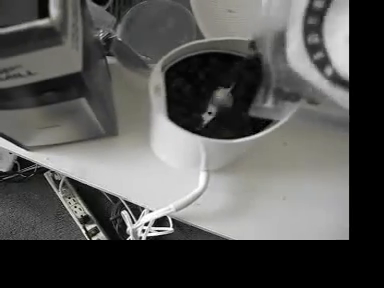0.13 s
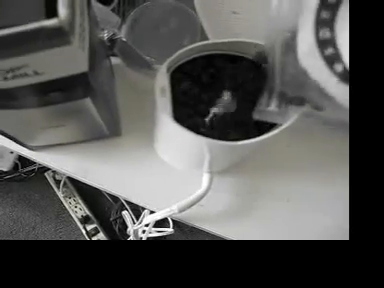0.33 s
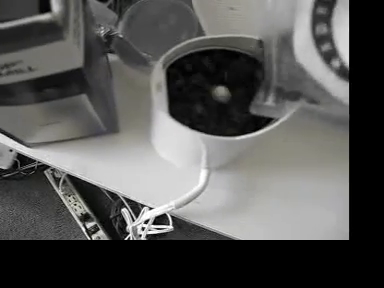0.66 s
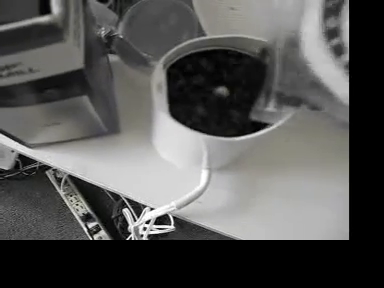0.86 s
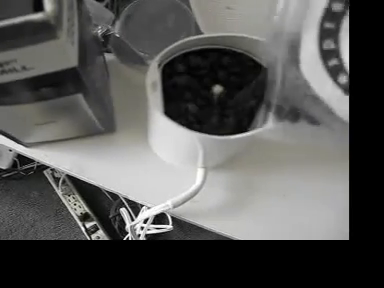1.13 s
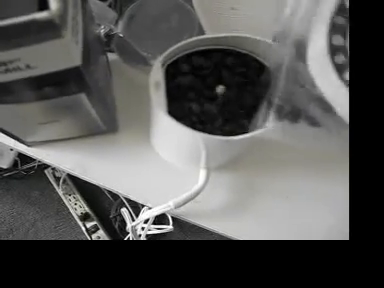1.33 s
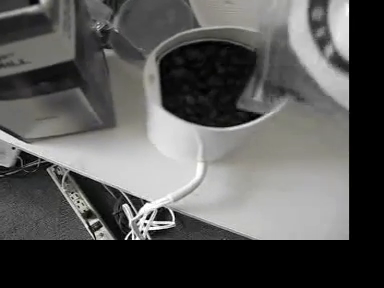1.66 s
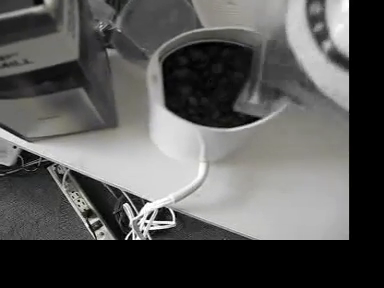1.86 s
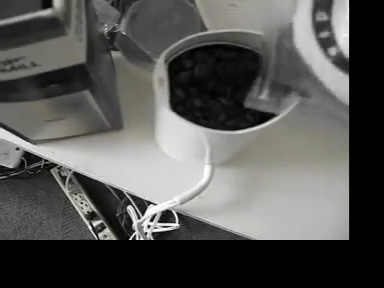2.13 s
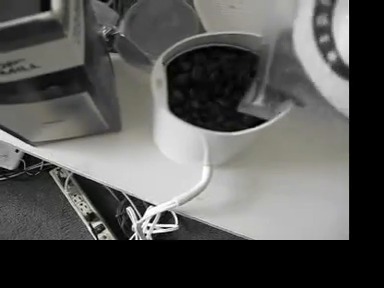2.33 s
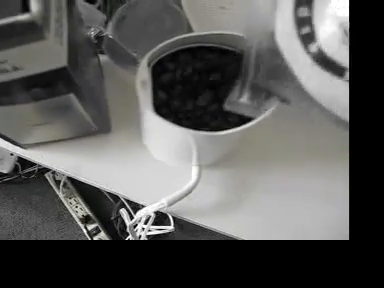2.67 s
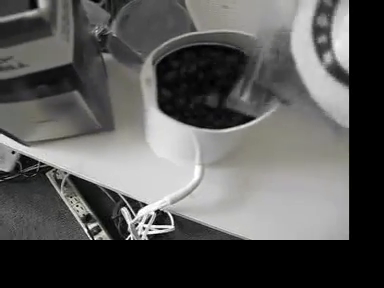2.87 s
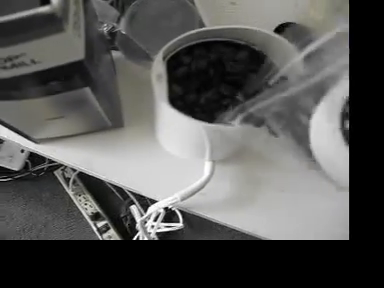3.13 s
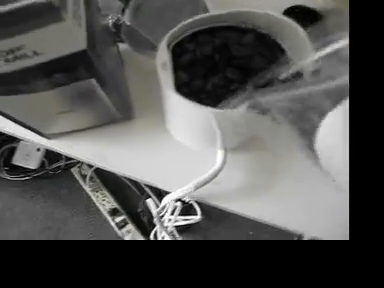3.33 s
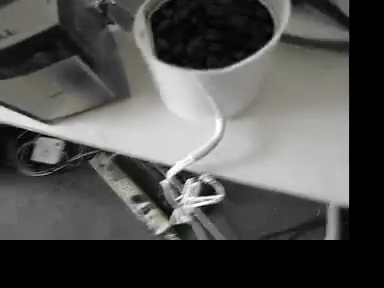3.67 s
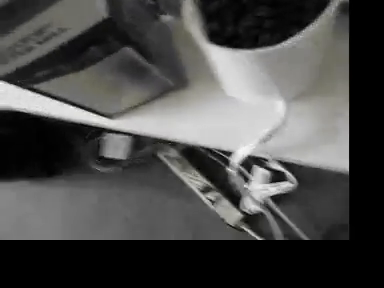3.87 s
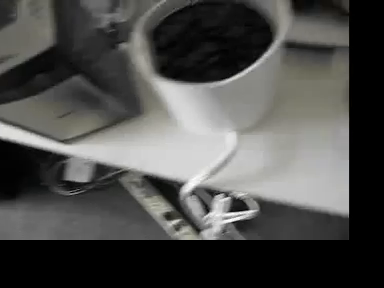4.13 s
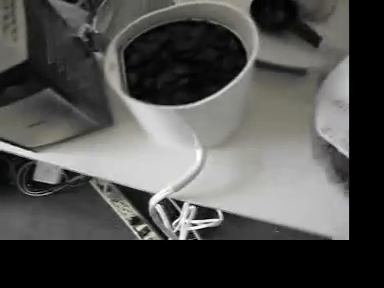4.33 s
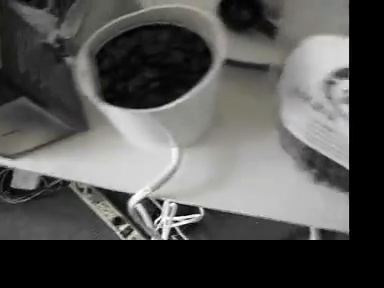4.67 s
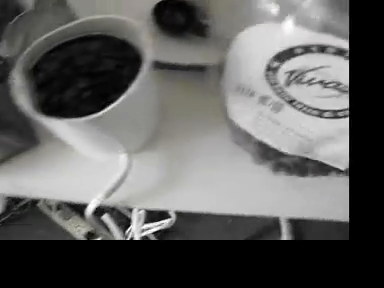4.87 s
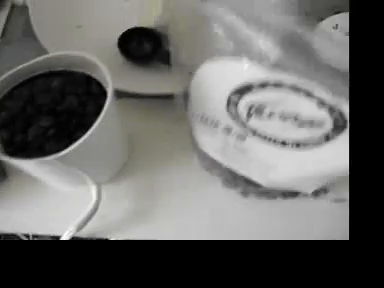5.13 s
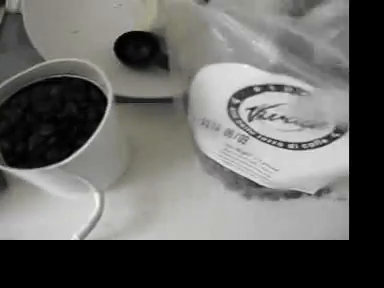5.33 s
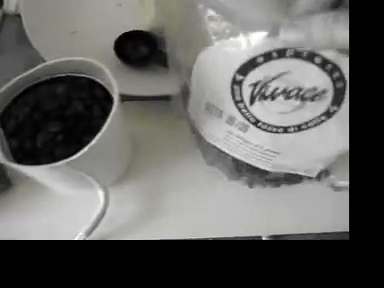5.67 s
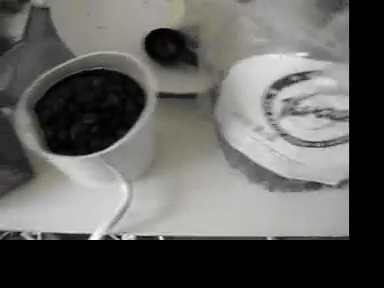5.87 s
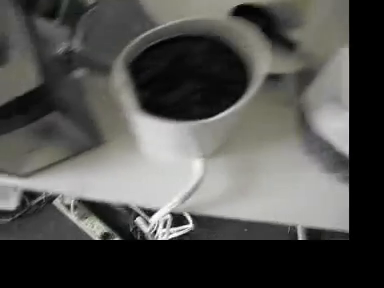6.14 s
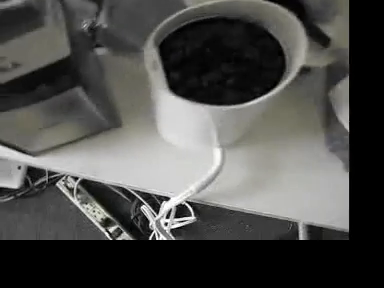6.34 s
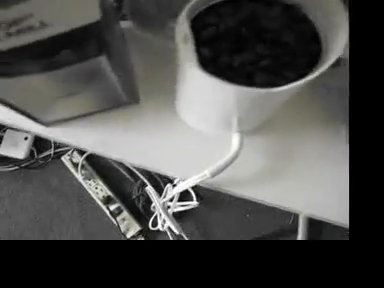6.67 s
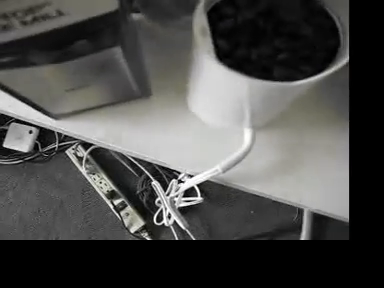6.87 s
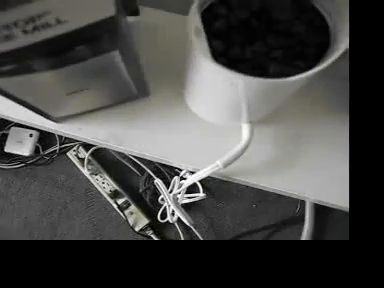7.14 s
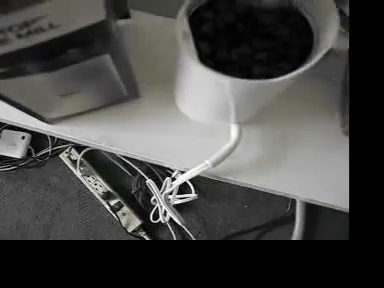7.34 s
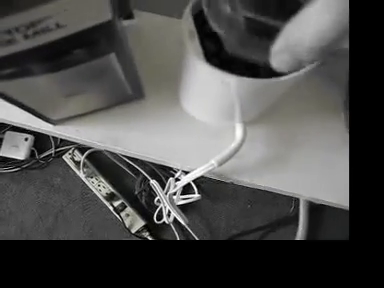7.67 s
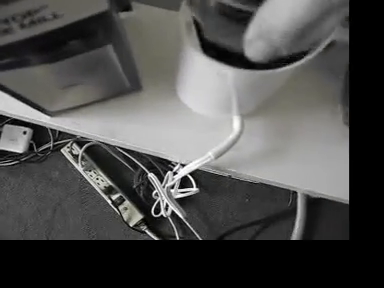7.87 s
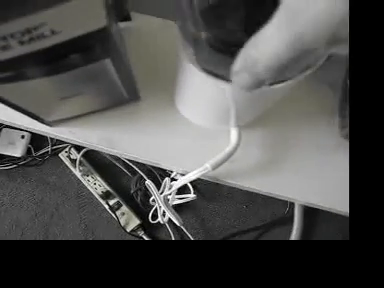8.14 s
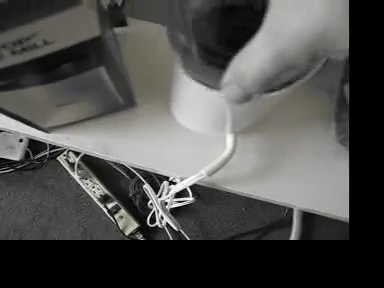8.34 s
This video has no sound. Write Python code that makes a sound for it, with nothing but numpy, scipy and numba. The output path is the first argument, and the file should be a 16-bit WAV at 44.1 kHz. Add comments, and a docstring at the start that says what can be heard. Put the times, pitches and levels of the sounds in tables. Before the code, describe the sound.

Crisp plastic film snaps and rattling beans fill the first three seconds, followed by broader crumples, bumps and slides of the bag across a table, with faint tiny squeaks. A quieter pause of steady hiss follows, broken by small crackles. Then a hard plastic lid taps and scrapes onto a hollow cup, its note sinking as it closes. Dry small room, close and slightly saturated microphone.

```python
"""Coffee beans are shaken out of a stiff plastic bag into the cup of a small blade grinder, close to a small
microphone in a quiet room. The bag crackles, slides over the table and is put down: noise bursts coloured by
its air, sheet and beans, with short damped sines for pops and pings. A few squeaks are gliding tones. Then a
plastic lid is knocked onto the cup, whose air note, a damped sine, falls as the lid closes. The motor stays off."""
import sys
import numpy as np
from scipy import signal
from scipy.fft import rfft, irfft
from scipy.io import wavfile
from scipy.ndimage import uniform_filter1d
from numba import njit

SR = 44100
rng = np.random.default_rng(int(sys.argv[2]) if len(sys.argv) > 2 else 0)


def gain_from_db(level_db):
    """Convert decibel levels to linear amplitude factors (20 dB per decade)."""
    decades = np.asarray(level_db, float) / 20
    return 10 ** decades


def unload_wav(signal):
    """Save mono or channel-first audio to the path in sys.argv[1] as 16-bit WAV at rate SR, clipped to [-1, 1]."""
    wavfile.write(
        sys.argv[1],
        SR,
        np.round(np.clip(np.atleast_2d(signal).T, -1, 1) * 32767).astype(np.int16),
    )


N = 374409  # length [samples]


def curves(table):
    """Linear interpolation: turns the columns of a table into signals over its first column, time."""
    s, *columns = np.transpose(table)
    return [np.interp(np.arange(N) / SR, s, c) for c in columns]


def gestures(table, swell, fade):
    """Power summation: rows of (start, hold, levels) swell and fade at rates in dB/s; gives levels in dB."""
    t, power = np.arange(N) / SR, 1e-12
    for start, hold, *db in table:
        before_db = np.outer(swell, np.maximum(start - t, 0))
        after_db = np.outer(fade, np.maximum(t - start - hold, 0))
        away_db = np.minimum(before_db + after_db, 200)
        power = power + gain_from_db(2 * (np.array(db)[:, None] - away_db))
    return 10 * np.log10(power)


def bursts(power, t60, rise_ms):
    """Exponential decay of energy: each power spike starts a noise puff; also gives the area of the decay."""
    pole = np.exp(-2 * np.log(1000) / (t60 * SR))
    lag = np.exp(-1000 / (rise_ms * SR))
    swell = signal.lfilter([1 - lag], np.convolve([1, -pole], [1, -lag]), power)
    return np.sqrt(np.abs(swell)) * rng.standard_normal(N), 1 / (1 - pole)


def ringing(x, colour):
    """Minimum-phase filtering: a spectrum (Hz, dB) becomes a causal response of unit energy."""
    hz, db = np.transpose(colour)
    log_gain = np.interp(np.log(np.arange(513) * SR / 1024 + 1), np.log(hz), db) * np.log(10) / 20
    # folding the cepstrum onto positive times makes the response causal
    fold = irfft(log_gain) * np.r_[1, 2 * np.ones(511), 1, np.zeros(511)]
    h = irfft(np.exp(rfft(fold)))
    return signal.oaconvolve(x, h / np.linalg.norm(h))[:N]


@njit
def ring(start, hz, t60, size, rise):
    """Damped free vibration: decaying sines, less a faster decay that softens the attack."""
    out = np.zeros(N)
    for g in range(len(start)):
        turn = np.exp(2j * np.pi * hz[g] / SR - np.log(1000.) / (t60[g] * SR))
        z, lag = size[g] + 0j, 1.
        for i in range(start[g], min(N, start[g] + int(t60[g] * SR))):
            z, lag = z * turn, lag * rise
            out[i] += z.imag * (1 - lag)
    return out


def strike(s, hz, t60, db, rise_ms):
    """Impulse excitation: rings a mode for every (time, pitch, decay, level), broadcast together."""
    s, hz, t60, db = (np.ravel(a) * 1. for a in np.broadcast_arrays(s, hz, t60, db))
    rise = np.exp(-1000 / (rise_ms * SR))
    return ring((s * SR).astype(np.int64), np.clip(hz, 50, .45 * SR), t60, gain_from_db(db), rise)


def air():
    """Stationary random noise: steady hiss and room rumble, shaped in the frequency domain."""
    # room and microphone noise: (frequency [Hz], relative spectral density [dB])
    density = [(24, -13), (40, -9.5), (176, -7), (249, -7), (363, -7), (751, -7.5), (1440, -10.5),
               (1850, -12), (10700, -22.5), (16000, -36)]
    rms_db = -46.5
    hz, db = np.transpose(density)
    f = np.arange(N // 2 + 1) * SR / N + 1
    gain = gain_from_db(np.interp(np.log(f), np.log(hz), db))
    hiss = irfft(rfft(rng.standard_normal(N)) * gain, N)
    return gain_from_db(rms_db) * hiss / np.std(hiss)


def bag():
    """Impulsive excitation: loud cracks, chance small cracks and grains shake three parts of the bag."""
    # loud cracks of film and beans: (time [s], thud [dB], body [dB], snap [dB]), relative levels
    cracks = [(0.0516, -36, -15, -13), (.072, -39, -29, -3), (0.0983, -46, -17, -12),
              (0.1676, -45, -35, -13), (0.18, -30, -23, -4), (0.2258, -39, -46, -10), (.2586, -43, -19, -8),
              (.317, -48, -28, -10), (.3423, -26, -22, -9), (.4265, -16, -24, -16), (0.4454, -23, -10, -21),
              (0.4564, -39, -18, -2), (0.4819, -40, -16.5, -4), (0.509, -35, -22, -19),
              (.5864, -26, -18, -6), (0.6308, -20.5, -16, -14), (0.6552, -38, -23, -7),
              (0.7045, -30, -17.5, -8), (0.7619, -28, -20, -8), (0.7912, -35, -17, -4),
              (.8024, -51.5, -27, -10), (0.8474, -28, -16, -4), (0.8552, -25, -19, -5),
              (0.8998, -47, -24, -3), (.9081, -45, -34, -5), (0.928, -44, -28.5, -7),
              (0.956, -47, -19, 0.5), (1.0115, -36, -20, -28), (1.0876, -33, -36, -18),
              (1.116, -26, -18.5, -5.5), (1.1345, -52, -23, -7), (1.161, -41, -20, -5),
              (1.2329, -44, -42, -6), (1.2381, -32, -37, -7.5), (1.2685, -52, -44, -10.5),
              (1.2919, -42, -13.5, -8), (1.299, -39, -41, -6), (1.3272, -34, -15, -25),
              (1.4495, -11, -14.5, -9), (1.462, -38, -34, -8.5), (1.515, -18, -14, -29),
              (1.5549, -45, -18.5, -9.5), (1.6003, -16, -20, -15), (1.682, -43, -20, -8),
              (1.697, -30, -31, -7), (1.7087, -38, -21, -7), (1.76, -11, -14.5, -3), (1.7955, -41, -29, -7),
              (1.8794, -41, -25, -9.5), (1.9335, -13, -16, -12), (1.9403, -51, -30, -4),
              (1.9733, -36, -33, -11), (2.001, -27, -17, -0.5), (2.025, -24, -21, -3),
              (2.0471, -32, -36, -9), (2.0783, -15.5, -37, -28), (2.1168, -45, -26, -5),
              (2.1767, -38, -21, -30), (2.1883, -21, -25, -33), (2.219, -40, -57, -17.5),
              (2.2548, -14.5, -14.5, -19), (2.338, -22, -17, -31), (2.3897, -47, -45, -7),
              (2.4273, -38, -30, -7), (2.4543, -43, -31, -11), (2.4748, -31, -35, -10),
              (2.524, -43, -23, -13), (2.5615, -16, -40, -6.5), (2.7128, -39, -23, -14),
              (2.7759, -49, -49, -12), (2.8401, -12.5, -11.5, -30), (2.877, -54, -28, -12.5),
              (2.9125, -23.5, -23, -45), (3.0035, -40, -23, -6.5), (3.0404, -12, -12, -24),
              (3.0779, -28, -5, -33), (3.2436, -21, -9, -17), (3.288, -17, -9, -40),
              (3.2974, -18, -3.5, -37), (3.373, -28, -27, -44), (3.403, -10, -10, -34),
              (3.5162, -28, -24, -15.5), (3.58, -31, -14.5, -36), (3.6368, -15, -6.5, -26),
              (3.656, -28, -8, -27), (3.695, -29, -12, -16), (3.7706, -12, -9.5, -11),
              (3.806, -41, -40, -16), (3.839, -41, -52, -17), (3.86, -39, -50, -28),
              (3.8936, -22, -19.5, -42), (3.911, -16, -11, -23), (3.9362, -18, -3, -29),
              (3.959, -23, -3.5, -20), (3.9822, -36, -3, -27), (4.105, -39, 2, -4.5),
              (4.1821, -16, -1, -16), (4.187, -17, -5.5, -23), (4.327, -30, -17, -27),
              (4.379, -40, -25, -18), (4.405, -45, -35, -21), (4.4825, -8, -0.5, -1),
              (4.7485, -25, -9, -24), (4.7868, -18, -10.5, -35), (4.8823, -21, -5.5, -39),
              (4.9876, -25.5, -23.5, -48), (5.1295, -28, -27, -41), (5.326, -45, -40, -38),
              (5.3425, -19, -11.5, -27), (5.354, -19, -4.5, -16), (5.37, -27, -1.5, -14),
              (5.3876, -31, -8, -7), (5.4446, -24, -15, -33), (5.5097, -25, -16.5, -49),
              (5.6609, -51, -26.5, -24.5), (6.719, -31, -44, -45), (6.902, -48, -28.5, -21),
              (6.9816, -47, -29, -17), (7.0174, -23, -14, -9.5), (7.057, -30.5, -21, -12)]
    # shakes, slides and folds: (start [s], hold [s], thud [dB], body [dB], snap [dB]), relative levels
    moves = [(.03, 0.13, -45, -32.5, -30.5), (.23, 0.22, -47, -34, -33), (.43, 0.13, -47, -38, -33),
             (.59, 0.11, -43.5, -34.5, -33.5), (.79, 0.27, -44, -36, -37), (1.09, 0.14, -46.5, -36, -35),
             (1.29, 0.13, -41.5, -38, -45.5), (1.46, 0.046, -42.5, -38.5, -49),
             (1.6, 0.084, -40, -33, -39.5), (1.75, 0.1, -39.5, -33, -37), (1.94, 0.25, -49, -39, -39.5),
             (2.33, 0.19, -46, -37.5, -39), (2.55, .12, -42, -37.5, -36.5), (2.77, 0.16, -52, -46, -46),
             (2.96, 0.05, -36.5, -35, -44), (3.08, 0.058, -37, -36.5, -51), (3.29, 0.042, -36, -36.5, -49),
             (3.53, 0.095, -43, -36.5, -42), (3.63, 0.099, -28.5, -22.5, -24.5),
             (3.92, 0.037, -39, -33.5, -36), (3.97, 0.11, -30, -24, -27), (4.17, 0.21, -36, -28, -27),
             (4.49, 0.017, -35, -30.5, -31.5), (4.77, 0.11, -36.5, -34, -47),
             (5.03, 0.01, -46, -35.5, -42.5), (5.37, 0.043, -36.5, -29, -34), (5.65, 0.014, -52, -39, -47),
             (5.77, 0.0075, -49.5, -47, -54), (6.49, .02, -66, -52, -59), (6.71, 0.01, -49, -54, -56),
             (6.79, 0.029, -52, -54, -47), (6.9, 0.025, -50, -48, -45), (7.005, 0.01, -38.5, -33, -29.5)]
    # handling of the bag: (time [s], spread of grain sizes [dB], share of bright snaps [0-1],
    # share of rattling beans [0-1], level of small cracks [dB])
    touch = [(0, 5, 1, 0.99, 0.5), (1.3, 5, 0.86, 0.75, 4), (1.5, 5, 0.97, 0.22, -1),
             (2.1, 3, 0.92, 0.07, 4.5), (2.7, 5, 1, 0.07, 3), (3, 6.5, 0.5, 0.06, -0.5),
             (3.3, 11, 0.4, 0, -9), (3.6, 2.5, 0.12, 0.05, -16), (3.85, -2, 1, 0, -7),
             (3.96, 2, 0.37, 0, -7), (4.3, -1, 0.96, 0.7, -10), (4.5, 3.5, .4, 0.23, -10.5),
             (4.8, 4.5, 0, .23, -1), (5.4, 2.5, .05, 0.1, -14), (5.8, 4, 0.3, 0.05, -26),
             (7, 4, 0.32, 0.16, -2)]
    # rows thud, body, snap: (t60 [s], rise [ms], attack [dB], grain rate [1/s])
    parts = [(0.0048, 1.5, -3.5, 2500), (0.0062, 1.2, 0.5, 2000), (0.0018, 0.27, 1.5, 1100)]
    # sharp first step of the film in a crack: level [dB] for thud, body, snap
    click_db = [1, -0.5, -1]
    # colour of the air in the bag: (frequency [Hz], level [dB])
    thud_colour = [(60, -49), (130, -22.5), (250, -20.5), (450, -11), (650, -5.5), (950, -8.5),
                   (1300, -14.5), (3000, -50.5)]
    # colour of the stiff sheet: (frequency [Hz], level [dB])
    sheet_colour = [(500, -17.5), (1100, -7.5), (1500, 0), (1950, -2.5), (2350, -2), (2800, -3), (3500, -8),
                    (4600, -13), (7000, -20), (16000, -42)]
    # colour of the beans: (frequency [Hz], level [dB])
    bean_colour = [(500, -40.5), (1200, -9.5), (1550, 1.5), (1950, 2.5), (2350, -0.5), (2800, 4),
                   (3400, 1.5), (4300, -6.5), (7000, -7.5), (16000, -39.5)]
    # colour of the bright snaps: (frequency [Hz], level [dB])
    snap_colour = [(3000, -44.5), (5000, -16.5), (7500, -13.5), (9500, -11.5), (11600, -6.5), (13000, -11),
                   (14500, -21), (16000, -33.5)]
    # colour of the duller folds: (frequency [Hz], level [dB])
    fold_colour = [(3000, -15.5), (4500, 5.5), (6000, 2.5), (8000, -2), (11000, 0), (14000, -13.5),
                   (16000, -44)]
    swell_db_per_s, fade_db_per_s = [313, 328, 400], [142, 168, 213]  # thud, body, snap
    crackle_db, crackle_spread_db = [1.5, 6, 14.5], [6, 6, 5.5]  # small cracks over the rustle of each part
    crackles_per_s = 115  # inverse of the median gap
    pop_hz, pop_t60_s = 736, .017
    ping_hz, ping_spread_db, ping_t60_s, ping_db = 10400, 2.0, 0.0037, -1.5

    s, *crack_db = np.transpose(cracks)
    crisp_db, bright, rattle, small_db = curves(touch)
    # sizes have a long tail: crisp handling gives a few large grains among many small ones
    chance = rng.random(N)
    tail = -np.log(np.maximum(rng.random(N), .005))
    grain_power = gain_from_db(2 * np.clip(crisp_db, 0, 6) * tail)

    gap, facet, *scatter = rng.standard_normal((1200, 5)).T
    at = (np.cumsum(np.exp(.5 * gap)) * SR / crackles_per_s).astype(int)
    inside, at = at < N, np.minimum(at, N - 1)

    shakes = []
    for k, soft_db in enumerate(gestures(moves, swell_db_per_s, fade_db_per_s)):
        t60, rise_ms, attack_db, rate = parts[k]
        loud = np.bincount((s * SR).astype(int), gain_from_db(crack_db[k] + attack_db) ** 2, N)
        spread_db = crackle_spread_db[k] * np.minimum(scatter[k], 1.6)
        small = inside * gain_from_db((soft_db + small_db)[at] + crackle_db[k] + spread_db) ** 2
        spikes = loud + np.bincount(at, small, N)
        grains = (chance < rate / SR) * grain_power
        even_grains = grains / (uniform_filter1d(grains, size=SR // 10) + 1e-9)
        shower, area = bursts(even_grains, t60, rise_ms)
        rustle = gain_from_db(soft_db) * shower / np.sqrt(area)
        clicks = gain_from_db(click_db[k]) * np.sqrt(spikes)
        shakes.append(bursts(spikes, t60, rise_ms)[0] + clicks + rustle)
    snap_crackles = small  # the last part is the snap

    thud, body, snap = shakes
    bright, rattle = np.clip(bright, 0, 1), np.clip(rattle, 0, 1)
    sheet = ringing(body * np.sqrt(1 - rattle), sheet_colour)
    beans = ringing(body * np.sqrt(rattle), bean_colour)
    snaps = ringing(snap * np.sqrt(bright), snap_colour)
    folds = ringing(snap * np.sqrt(1 - bright), fold_colour)
    # a loud crack pops the air pocket in the bag
    pocket_hz = pop_hz * gain_from_db(5.4 * (rng.random(len(s)) - 0.47))
    pops = strike(s, pocket_hz, pop_t60_s, crack_db[0] - 0.5, 0.34)
    # each crease rings its own facet of film
    facet_hz = ping_hz * gain_from_db(ping_spread_db * facet)
    facet_db = 10 * np.log10(snap_crackles + 1e-12) + ping_db
    pings = strike(at / SR, facet_hz, ping_t60_s, facet_db, 0.062)
    return pops + pings + ringing(thud, thud_colour) + sheet + beans + snaps + folds


def room(x):
    """Reverberation: echoes of table and walls are decaying noise whose treble dies first."""
    t60_s, treble_t60_s, echo_db = 0.13, 0.11, -11
    t = np.arange(SR // 2) / SR
    noise = rng.standard_normal(len(t)) * (t > .002)
    low = signal.sosfilt(signal.butter(1, 2500, fs=SR, output="sos"), noise)
    tail = low * gain_from_db(-60 * t / t60_s) + (noise - low) * gain_from_db(-60 * t / treble_t60_s)
    return gain_from_db(echo_db) * signal.fftconvolve(x, tail / np.linalg.norm(tail))[:N]


def squeaks():
    """Stick-slip friction: film on film gives short, wavering, gliding tones with an octave."""
    # (start [s], length [s], first pitch [Hz], last pitch [Hz], level [dB], octave relative to it [dB])
    tones = [(4.385, .055, 4620, 4500, -44, -30), (4.525, .12, 4380, 4140, -46, -30),
             (6.785, .012, 3200, 3200, -46, -2), (6.81, .027, 3150, 3220, -43, -1)]
    out, t = np.zeros(N), np.arange(N) / SR
    for start, length, first_hz, last_hz, db, octave_db in tones:
        x = np.clip((t - start) / length, 0, 1)
        wobble = 1 + 0.034 * uniform_filter1d(rng.standard_normal(N), size=100)
        glide_hz = first_hz + (last_hz - first_hz) * x
        phase = 2 * np.pi * np.cumsum(glide_hz * wobble) / SR
        envelope = np.sqrt(np.abs(np.sin(np.pi * x))) * (x < 1)
        out += gain_from_db(db) * envelope * (np.sin(phase) + gain_from_db(octave_db) * np.sin(2 * phase))
    return out


def lid():
    """Cavity resonance: taps ring the cup's air, the shell and a tick; rubbing sustains the air notes."""
    # lid against cup: (time [s], low air note [dB], upper air note [dB], shell [dB], tick [dB]), relative
    taps = [(7.533, -14.5, -7.5, -12, -18.5), (7.536, -26, -32, -21, -42), (7.545, -15.5, -30, -39, -38),
            (7.555, -17.5, -39, -37, -35), (7.59, -22.5, -25, -38, -39), (7.612, -31, -34, -22.5, -28),
            (7.726, -39, -38, -49, -45), (7.747, -35, -32, -37, -48), (7.763, -29, -22, -27, -28),
            (7.773, -35, -18, -17.5, -27), (7.973, -38.5, -30, -26, -34), (7.978, -26, -10, -28, -30),
            (7.982, -6.5, -43, -28, -35), (7.988, -21, -45, -37, -42), (8.032, -31, -42, -53, -54),
            (8.104, -30, -36, -49, -46), (8.113, -25, -20, -31, -37.5), (8.21, -3, -5, -25, -31),
            (8.219, -4.5, -46, -40, -27), (8.234, -9, -35, -28, -39), (8.26, -19, -24, -53, -51),
            (8.271, -19, -40, -51, -51), (8.328, -23, -34, -51, -57), (8.35, -33, -47, -47, -57),
            (8.361, -25, -29, -44, -23), (8.38, -22.5, -32, -53, -51), (8.401, -38, -47, -32, -36),
            (8.41, -28, -37, -29.5, -40)]
    # low air note of the cup under the closing lid: (time [s], frequency [Hz])
    cup_note = [(7.5, 1150), (7.64, 1060), (7.72, 1000), (7.78, 1100), (7.98, 1070), (8.04, 1030),
                (8.12, 956), (8.22, 938), (8.31, 860), (8.37, 664), (8.49, 615)]
    # lid rubbing on the rim: (start [s], hold [s], air note [dB], scrape [dB]), relative levels
    rubs = [(7.54, 0.056, -26.5, -41), (7.75, 0.023, -27, -39.5), (7.986, 0.053, -33, -55),
            (8.116, 0.0085, -35, -59), (8.216, 0.084, -23.5, -53), (8.34, 0.06, -30, -52)]
    # modes of the lid shell: (frequency [Hz], relative level [dB], t60 [s])
    shell_modes = [(2450, 0, .028), (2970, 0, .022), (3350, -3, .016), (2000, -10, .01), (4600, -10, .012)]
    # colour of ticks and scrapes on the rim: (frequency [Hz], level [dB])
    rim_colour = [(1000, -13), (2500, 5.5), (3300, 2), (5000, -3.5), (7500, 0.5), (11000, -7.5),
                  (16000, -19)]
    swell_db_per_s, fade_db_per_s = 1500, 350
    upper_hz, upper_even_hz, upper_db_per_hz = 1610, 1070, 0.08
    bowl_hz, bowl_db = 700, -20  # lowest ring of the cup, level relative to the low air note's table
    cup_t60_s, clack_t60_s = .022, .005

    s, cup_db, upper_db, shell_db, tick_db = np.array(taps).T[:, :, None]
    note_hz, = curves(cup_note)
    hum_db, scrape_db = gestures(rubs, [swell_db_per_s] * 2, [fade_db_per_s] * 2)
    # the rubbed upper note weakens as the low one falls
    upper_rub_db = upper_db_per_hz * (note_hz - upper_even_hz)

    tap_hz = note_hz[(s * SR).astype(int)]
    cup = strike(s, tap_hz, cup_t60_s, cup_db + 3.0, 0.45)
    cup = cup + strike(s, upper_hz, cup_t60_s, upper_db + 3.5, 1.0)
    cup = cup + strike(s, bowl_hz, cup_t60_s, cup_db + bowl_db, 0.68)
    clack = strike(s, 1100, clack_t60_s, cup_db + 11.0, 1.0)  # the contact itself

    hz, db, t60 = np.transpose(shell_modes)
    u, spot = rng.random((2, len(taps), len(shell_modes)))  # every blow lands on another spot
    mode_db = shell_db + db + 2.0 + 7 * (spot - .5)
    shell = strike(s, hz * gain_from_db(0.34 * (u - .5)), t60, mode_db, 0.71)
    tick_power = np.bincount((s[:, 0] * SR).astype(int), gain_from_db(tick_db[:, 0] + 2.5) ** 2, N)
    ticks = bursts(tick_power, 0.026, 0.38)[0]

    when, size, tilt = rng.random((700, 3)).T
    when = cup_note[0][0] + when * (cup_note[-1][0] - cup_note[0][0])
    at = np.minimum((when * SR).astype(int), N - 1)
    slip_db = hum_db[at] - 2.34 * np.log(size) - 10.5
    loose = gain_from_db(0.71 * (tilt - .5))  # the tilted lid leaves a changing gap, so the notes scatter
    rub = strike(when, note_hz[at] * loose, 0.038, slip_db, 0.37)
    rub = rub + strike(when, upper_hz / loose, 0.034, upper_rub_db[at] + slip_db, 0.23)
    rub = rub + strike(when, bowl_hz, 0.041, slip_db - 12, 0.89)
    scrape = gain_from_db(scrape_db) * rng.standard_normal(N)

    high_pass = signal.butter(2, 300, "high", fs=SR, output="sos")
    tones = signal.sosfilt(high_pass, cup + clack + shell + rub)
    return tones + ringing(ticks + scrape, rim_colour)


def scene():
    """Superposition: close sounds, their echoes and the hiss; small objects radiate no bass."""
    high_pass = signal.butter(2, 110, "high", fs=SR, output="sos")
    near = signal.sosfilt(high_pass, bag() + squeaks() + lid())
    return (near + room(near) + air())[None]


def top_cut(x):
    """Nothing passes above the cut-off."""
    return signal.sosfilt(signal.butter(12, 16970, fs=SR, output="sos"), x)


def record(dry):
    """Saturation and band limiting: the small microphone rounds the highest peaks and cuts the top."""
    top_hz = 15800
    low_pass = signal.ellip(8, .2, 50, top_hz, fs=SR, output="sos")
    rounded = np.tanh(0.98 * dry) / 1.294
    mix = signal.sosfilt(low_pass, rounded)
    return top_cut(mix)


dry = scene()
out = record(dry)
unload_wav(out)
```